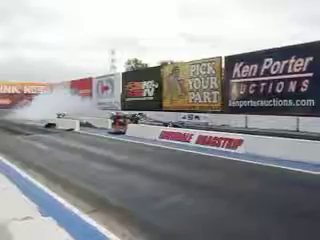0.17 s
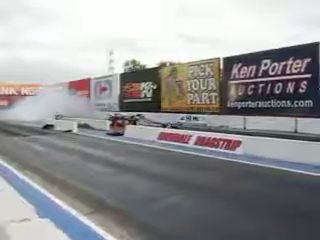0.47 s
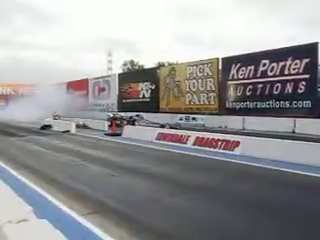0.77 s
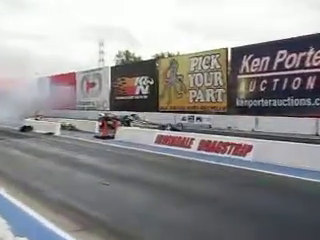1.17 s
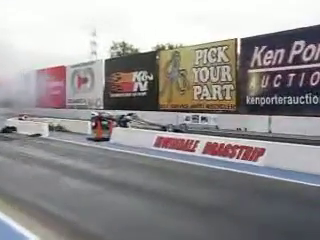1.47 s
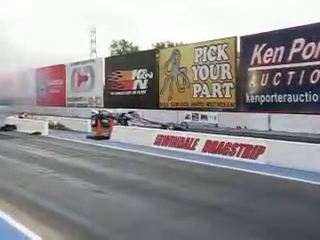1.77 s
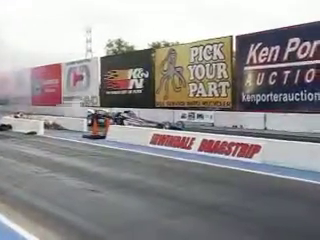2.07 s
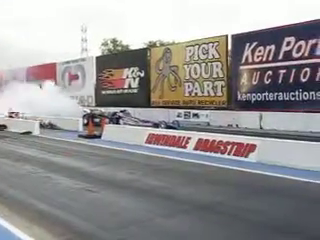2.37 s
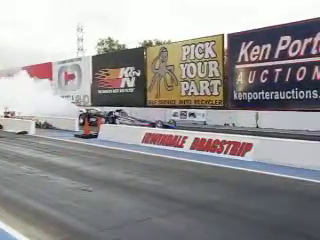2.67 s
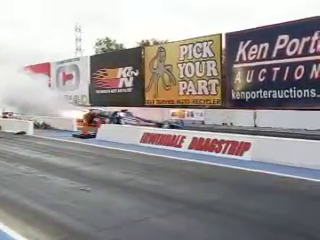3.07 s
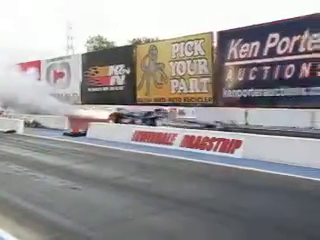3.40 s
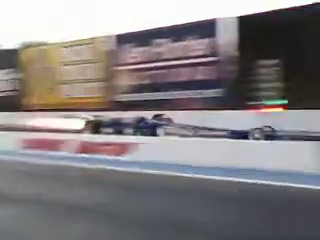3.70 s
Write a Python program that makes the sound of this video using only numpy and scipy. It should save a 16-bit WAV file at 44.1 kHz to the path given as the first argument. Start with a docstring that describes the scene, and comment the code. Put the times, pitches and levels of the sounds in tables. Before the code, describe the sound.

A jet dragster's wavering high whine rises over rushing exhaust and hiss, then a hard thump lights the afterburner and a rough roar buries the whine; outdoors across the strip, overloaded microphone.

```python
"""Jet dragster spooling up on the start line, heard from across the strip.
Compressor whine is a wandering blade tone with noise skirts, octave, shaft tones and hum.
Exhaust roar, intake hiss, burner rumble and flame are coloured noise; low air movement is slow noise.
The afterburner lights with a thump of decaying sines; the roar buries the whine as the car leaves.
The microphone input is driven far into overload, then filtered and gain-controlled."""
import sys
import numpy as np
from scipy import signal
from scipy.fft import rfft, irfft
from scipy.io import wavfile

SR = 44100
rng = np.random.default_rng(int(sys.argv[2]) if len(sys.argv) > 2 else 0)


def inscribe(sig):
    """Save sig as 16-bit PCM at rate SR to the path in sys.argv[1].

    A 1-D sig is mono; a 2-D sig holds one channel per row.
    Samples are clipped to [-1, 1] before scaling.
    """
    pcm = np.round(np.clip(np.atleast_2d(sig).T, -1, 1) * 32767)
    wavfile.write(sys.argv[1], SR, pcm.astype(np.int16))


N = 169344

# Blade-passing tone of the compressor. Each row: time in seconds, pitch in Hz.
BLADE_PITCH = [(0.04, 5899), (0.62, 5897), (.75, 5945), (.9, 6075), (1.08, 6215), (1.2, 6195), (1.4, 6104),
               (1.72, 6150), (1.9, 6370), (2.15, 6664), (2.36, 6840), (2.9, 6812), (3.45, 6835),
               (3.84, 6930)]
# Whine swelling and fading in the moving air. Each row: time in seconds, level in dB, left minus right in dB.
WHINE_LEVEL = [(.04, -26.5, -10), (.09, -15, 2), (.17, -12, 4), (.27, -14, -10), (.3, -19.5, -4),
               (.36, -16.5, -6), (.48, -18, -5), (.51, -22, 0.5), (.55, -19, 5), (.6, -21, -4),
               (.67, -15, 3), (.7, -18, -5), (.73, -15, 0), (.76, -32.5, 1), (.84, -13.5, -3),
               (.9, -17.5, 1), (.94, -25, 0), (1.19, -28, -6), (1.22, -19.5, -2), (1.28, -22, -1),
               (1.38, -22, 4), (1.42, -15.5, -3), (1.54, -12.5, -7), (1.57, -19.5, -3.5), (1.72, -21, -4),
               (1.79, -25.5, -1), (1.94, -21.5, 2), (2.1, -21, -1), (2.25, -21.5, 8), (2.4, -23.5, -4),
               (2.75, -27, 3), (2.81, -17.5, 6), (2.85, -30, 4), (2.92, -20, 4)]
# Stereo phase of the whine. Each row: time in seconds, left lead in radians.
WHINE_LEAD_RAD = [(.1, -0.97), (.45, 0.52), (.8, 0.86), (1.3, 0.65), (1.7, 0.84), (2.3, 1.1), (2.6, 0.35),
                  (2.85, 0.88)]
# Whine sinking at light-off. Each row: time in seconds, gain in dB.
WHINE_BURIAL_DB = [(2.93, -1.5), (2.945, -21), (3.3, -12), (3.84, -7)]
# Noisy skirt of the whine. Each row: time in seconds, level in dB.
HAZE_LEVEL = [(0.04, -27), (.4, -25.5), (.7, -22.5), (1.0, -25), (1.3, -22), (1.5, -25), (1.8, -22.5),
              (2.2, -25), (2.6, -25.5), (2.92, -23)]
# Second harmonic of the whine. Each row: time in seconds, level in dB.
OCTAVE_LEVEL = [(0, -30.5), (.6, -32), (.8, -28), (1.1, -33), (1.4, -27), (1.95, -29), (2.2, -34),
                (2.9, -46)]
# Tones of uneven blades. Each key: multiple of shaft speed. Each row: start in seconds, end in seconds,
# level in dB.
SHAFT_TONE_SPELLS = {10: [(0.93, 1.32, -38)], 12: [(1.0, 1.29, -38), (1.54, 1.75, -39), (2.27, 2.9, -37.5)],
                     17: [(0.97, 1.85, -37)], 19: [(1.4, 1.73, -40)], 21: [(.45, .85, -34),
                     (1.03, 1.19, -30), (1.3, 1.82, -31.5)], 22: [(1.03, 1.65, -37)]}
# Rough hum at shaft speed. Each row: time in seconds, level in dB.
SHAFT_HUM_LEVEL = [(1.78, -39), (1.86, -24.5), (2.45, -28.5), (2.7, -33), (2.9, -24), (3.15, -21),
                   (3.3, -30), (3.5, -19), (3.65, -43)]
# Exhaust roar. Each row: time in seconds, level in dB.
ROAR_LEVEL = [(0.1, -22.5), (0.93, -24.5), (0.94, -23), (1.46, -24), (2.33, -16.5), (2.92, -16.5),
              (2.96, -14), (3.1, -10), (3.84, -8)]
# Exhaust spectrum. Each row: frequency in Hz, relative density in dB per Hz.
ROAR_SPECTRUM = [(60, -7.5), (200, -6), (400, -3.5), (800, -2.5), (1270, -4.5), (2000, -2.5), (2390, -2.5),
                 (3100, -5.5), (5350, -10.5), (6920, -14), (11800, -22.5), (15000, -29.5)]
# Exhaust stereo image. Each row: frequency in Hz, left-right likeness from 0 to 1.
EXHAUST_LIKENESS = [(60, .5), (300, 0.85), (1400, 0.9), (3000, 0.52), (7000, 0.6), (14000, 0.22)]
# Intake hiss. Each row: time in seconds, level in dB.
HISS_LEVEL = [(0, -25), (1, -26.5), (1.8, -22.5), (2.4, -24), (3.0, -25.5), (3.84, -17)]
# Intake spectrum. Each row: frequency in Hz, relative density in dB per Hz.
HISS_SPECTRUM = [(2500, -9.5), (4000, -8), (5500, 0.5), (7500, -5.5), (10000, -11.5), (12500, -14),
                 (15000, -14)]
# Stereo image of engine front and burner. Each row: frequency in Hz, left-right likeness from 0 to 1.
ENGINE_LIKENESS = [(30, 1), (250, 1), (1000, 1), (3000, 0.83), (8000, 0.51), (14000, .3)]
# Burner rumble. Each row: time in seconds, level in dB.
RUMBLE_LEVEL = [(0.1, -28), (.8, -27), (1.3, -27), (1.7, -27), (1.92, -22), (2.5, -21.5), (2.92, -21),
                (2.95, -14.5), (3.1, -13), (3.25, -17), (3.5, -16), (3.65, -18), (3.84, -28)]
# Burner spectrum. Each row: frequency in Hz, relative density in dB per Hz.
RUMBLE_SPECTRUM = [(40, -20), (60, -9), (120, -4.5), (200, 0), (290, -1.5), (400, -7.5), (700, -30)]
# Afterburner flame, a harsh tearing. Each row: time in seconds, level in dB.
FLAME_LEVEL = [(2.93, -60), (2.95, -21.5), (3.1, -23), (3.5, -22), (3.84, -14)]
# Flame spectrum. Each row: frequency in Hz, relative density in dB per Hz.
FLAME_SPECTRUM = [(700, -5), (1300, -6), (2000, 1), (2500, -6), (3500, -18), (6000, -14)]
# Light-off and its return from the boards along the strip. Each row: start in seconds, peak in dB,
# pitch in Hz, 60 dB decay in seconds.
THUMP_WAVES = [(2.9325, 2, 90, .055), (3.012, -5, 60, .09)]

BLADES = 24
SHIMMER_DB, SHIMMER_RATE_HZ = 2.5, 46
WANDER_HZ, WANDER_RATE_HZ = 12, 37
HAZE_CORNER_HZ, WIDE_HAZE_DB, WIDE_HAZE_CORNER_HZ = 96, -1, 593
OCTAVE_CORNER_HZ, HUM_CORNER_HZ = 99, 14.6
SHAFT_FADE_S, SHAFT_FLICKER_DB, SHAFT_FLICKER_RATE_HZ = 0.12, 2.4, 10
BUFFET_DB, BUFFET_CORNER_HZ = -30, 89
WAKE_DB, WAKE_CORNER_HZ, WAKE_T60_S = -7.5, 148, 0.47

INPUT_OPEN_S, DRIVE_DB, CLIP_LEVEL, LEAK_DB = .0362, 7.5, 0.43, -12
BASS_CUT_HZ, RUMBLE_CUT_HZ, TREBLE_ROLL_HZ, CUTOFF_HZ = 407, 80, 15000, 16000
OPEN_GAIN_DB, THRESHOLD_DB, ATTACK_S, RELEASE_DB_PER_S = 8.5, -12, .0015, 3

TIME_S = np.arange(N) / SR
SIDES = np.array([[.5], [-.5]])  # left, right: a difference of 1


def from_db(db):
    """Decibels to amplitude gain."""
    return 10 ** (np.asarray(db) / 20)


def rms_one(x):
    """Scale to unit rms."""
    return x / np.sqrt(np.mean(x ** 2) + 1e-20)


def in_time(rows):
    """Table columns joined by straight lines in time."""
    time_s, *columns = np.transpose(rows)
    return [np.interp(TIME_S, time_s, column) for column in columns]


def at_hz(points, hz):
    """Table read on a log-frequency axis."""
    point_hz, value = np.transpose(points)
    return np.interp(np.log(hz), np.log(point_hz), value)


def drift(corner_hz, channels=1):
    """Unit-rms slow noise: white noise through two equal one-pole low-passes."""
    settle = SR // 4
    r = np.exp(-2 * np.pi * corner_hz / SR)
    white = rng.standard_normal((channels, N + settle))
    slow = signal.lfilter([1], [1, -2 * r, r * r], white)
    return rms_one(slow[:, settle:])


def stereo_drift(corner_hz, apart):
    """Slow noise common to both sides plus an independent share on each."""
    return drift(corner_hz) + apart * drift(corner_hz, channels=2)


def narrow_noise(corner_hz, apart=0.8):
    """Complex slow noise that turns a carrier into a noisy line."""
    real = stereo_drift(corner_hz, apart)
    imaginary = stereo_drift(corner_hz, apart)
    return (real + 1j * imaginary) / 2


def coloured_noise(spectrum, likeness, flicker_db):
    """Unit-rms stereo noise of given spectrum and side likeness, flickering in level."""
    hz = np.maximum(np.fft.rfftfreq(N, 1 / SR), 1)
    mid, side = rfft(rng.standard_normal((2, N)))
    alike = np.clip(at_hz(likeness, hz), 0, 1)
    pair = np.sqrt(1 + alike) * mid + np.sqrt(1 - alike) * side * [[1], [-1]]
    # 12 dB per octave fall outside the tabled band
    low_hz, high_hz = spectrum[0][0], spectrum[-1][0]
    skirts = np.minimum(1, np.minimum(hz / low_hz, high_hz / hz)) ** 2
    noise = irfft(pair * from_db(at_hz(spectrum, hz)) * skirts, N)
    return rms_one(noise * from_db(flicker_db * drift(30)))


def blade_phase():
    """Integrate the wandering blade rate to phase in radians, with the left-right lead."""
    pitch_hz, = in_time(BLADE_PITCH)
    lead_rad, = in_time(WHINE_LEAD_RAD)
    wandering_hz = pitch_hz + WANDER_HZ * drift(WANDER_RATE_HZ)[0]
    return 2 * np.pi * np.cumsum(wandering_hz) / SR + SIDES * lead_rad


def blade_whine(phase):
    """Blade-passing tone with noise skirts and a noisy octave."""
    level_db, pan_db = in_time(WHINE_LEVEL)
    clean = from_db(level_db + pan_db * SIDES + SHIMMER_DB * drift(SHIMMER_RATE_HZ))
    haze = narrow_noise(HAZE_CORNER_HZ) + from_db(WIDE_HAZE_DB) * narrow_noise(WIDE_HAZE_CORNER_HZ)
    haze = from_db(in_time(HAZE_LEVEL)[0] - 0.99 * SIDES) * haze
    octave = from_db(in_time(OCTAVE_LEVEL)[0]) * narrow_noise(OCTAVE_CORNER_HZ)
    whine = (clean + haze) * np.exp(1j * phase) + octave * np.exp(2j * phase)
    return from_db(in_time(WHINE_BURIAL_DB)[0]) * whine.real


def shaft_tones(phase):
    """Uneven blades sound multiples of shaft speed, each for a while."""
    tones = 0
    for multiple, spells in SHAFT_TONE_SPELLS.items():
        heard = 0
        for start_s, end_s, level_db in spells:
            edge_s = np.minimum(TIME_S - start_s, end_s - TIME_S)
            heard = heard + from_db(level_db) * np.clip(edge_s / SHAFT_FADE_S + .5, 0, 1)
        flicker = from_db(SHAFT_FLICKER_DB * drift(SHAFT_FLICKER_RATE_HZ))
        tone = np.sin(phase * multiple / BLADES + rng.uniform(0, 2 * np.pi))
        tones = tones + heard * flicker * tone
    return tones


def shaft_hum(phase):
    """Noisy line at shaft speed, the blade rate over the blade count."""
    line = narrow_noise(HUM_CORNER_HZ, apart=0.2) * np.exp(1j * phase / BLADES)
    return from_db(in_time(SHAFT_HUM_LEVEL)[0]) * line.real


def compressor():
    """Whine, shaft tones and hum locked to one rotor phase."""
    phase = blade_phase()
    return np.sqrt(2) * (blade_whine(phase) + shaft_tones(phase) + shaft_hum(phase))


def exhaust_roar():
    """Broadband jet turbulence, stronger on the left."""
    noise = coloured_noise(ROAR_SPECTRUM, EXHAUST_LIKENESS, flicker_db=1.0)
    return from_db(in_time(ROAR_LEVEL)[0] + 1.6 * SIDES) * noise


def intake_hiss():
    """High-pitched inflow turbulence, slightly stronger on the left."""
    noise = coloured_noise(HISS_SPECTRUM, ENGINE_LIKENESS, flicker_db=1.5)
    return from_db(in_time(HISS_LEVEL)[0] + SIDES) * noise


def burner_rumble():
    """Low combustion noise, nearly alike on both sides."""
    noise = coloured_noise(RUMBLE_SPECTRUM, ENGINE_LIKENESS, flicker_db=1.5)
    return from_db(in_time(RUMBLE_LEVEL)[0]) * noise


def air_buffet():
    """Steady low air movement as slow, mostly shared noise."""
    return from_db(BUFFET_DB) * stereo_drift(BUFFET_CORNER_HZ, apart=0.25)


def afterburner_flame():
    """Harsh tearing combustion noise from light-off on."""
    noise = coloured_noise(FLAME_SPECTRUM, EXHAUST_LIKENESS, flicker_db=1.5)
    return from_db(in_time(FLAME_LEVEL)[0]) * noise


def light_off():
    """Pressure waves that swing a few times, then low turbulence dying away."""
    waves = 0
    for start_s, peak_db, pitch_hz, t60_s in THUMP_WAVES:
        since_s = np.maximum(TIME_S - start_s, 0)
        waves = waves - from_db(peak_db - 60 * since_s / t60_s) * np.sin(2 * np.pi * pitch_hz * since_s)
    since_s = np.maximum(TIME_S - THUMP_WAVES[0][0], 0)
    decay = (since_s > 0) * from_db(WAKE_DB - 60 * since_s / WAKE_T60_S)
    return waves + decay * stereo_drift(WAKE_CORNER_HZ, apart=0.22)


def scene():
    """Sum engine front, exhaust and afterburner."""
    engine = compressor() + exhaust_roar() + intake_hiss() + burner_rumble()
    return engine + air_buffet() + afterburner_flame() + light_off()


def overload(x):
    """Hard-clip the driven input, with a little unclipped signal leaking past."""
    driven = from_db(DRIVE_DB) * x
    clipped = np.clip(driven, -CLIP_LEVEL, CLIP_LEVEL)
    return (clipped + from_db(LEAK_DB) * driven) * (TIME_S >= INPUT_OPEN_S)


def gain_control(x):
    """Cut gain by the peak excess over threshold: smoothed attack, linear dB release."""
    peak_db = 20 * np.log10(np.abs(x).max(0) + 1e-9)
    over_db = np.maximum(peak_db - THRESHOLD_DB, 0)
    release_db = RELEASE_DB_PER_S * TIME_S
    held_db = np.maximum.accumulate(over_db + release_db) - release_db
    held_db[TIME_S < INPUT_OPEN_S] = 0
    r = np.exp(-1 / (ATTACK_S * SR))
    reduction_db = signal.lfilter([1 - r], [1, -r], held_db)
    return np.clip(x * from_db(OPEN_GAIN_DB - reduction_db), -1, 1)


def record(dry):
    """Overload, first-order bass and treble cuts, gain control, steep top cut."""
    x = overload(dry)
    for cut_hz, kind in [(BASS_CUT_HZ, "high"), (RUMBLE_CUT_HZ, "high"), (TREBLE_ROLL_HZ, "low")]:
        x = signal.lfilter(*signal.butter(1, cut_hz, kind, fs=SR), x)
    x = gain_control(x)
    return signal.sosfilt(signal.cheby2(12, 70, CUTOFF_HZ, fs=SR, output="sos"), x)


dry = scene()
out = record(dry)
inscribe(out)
```